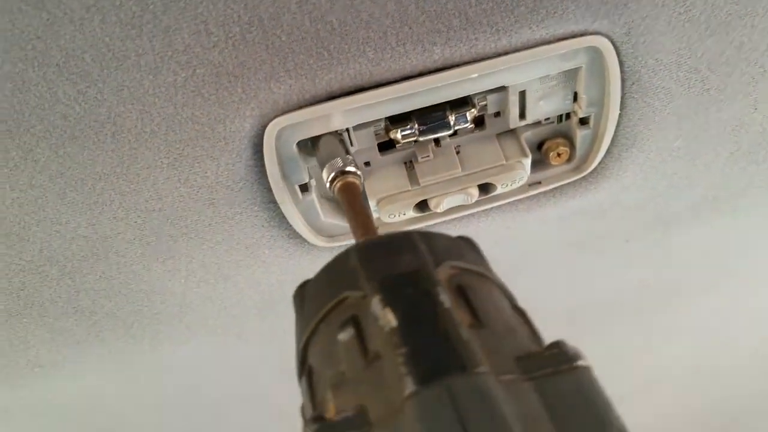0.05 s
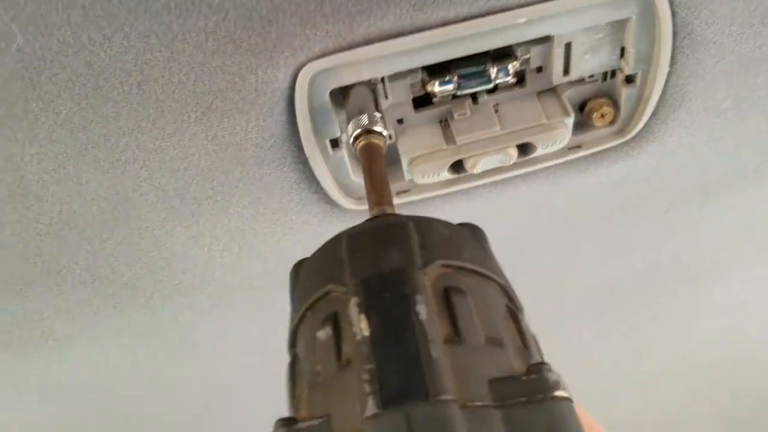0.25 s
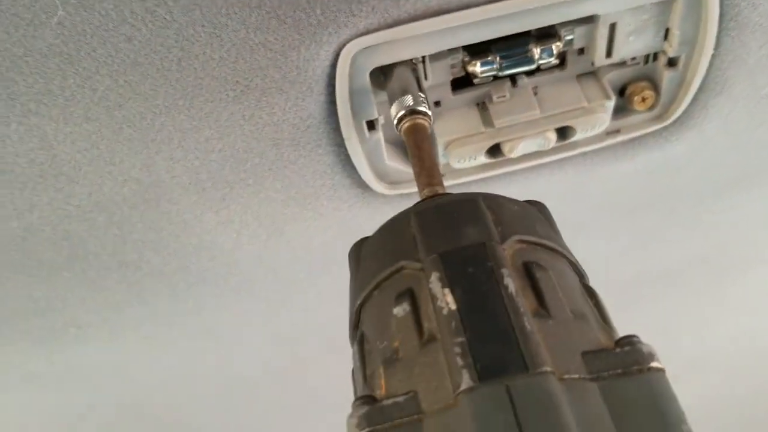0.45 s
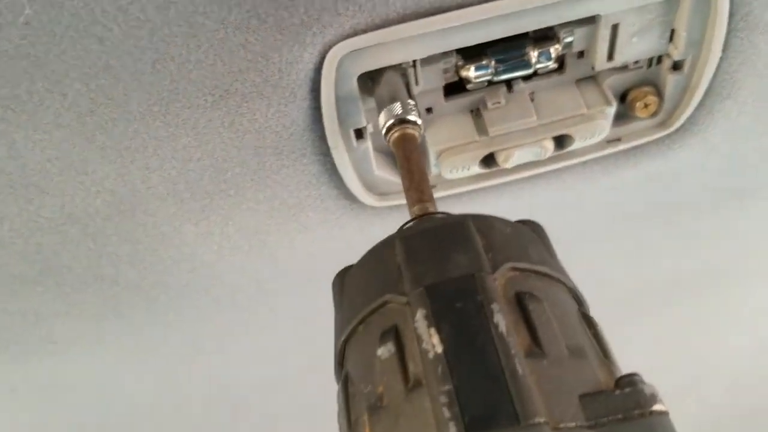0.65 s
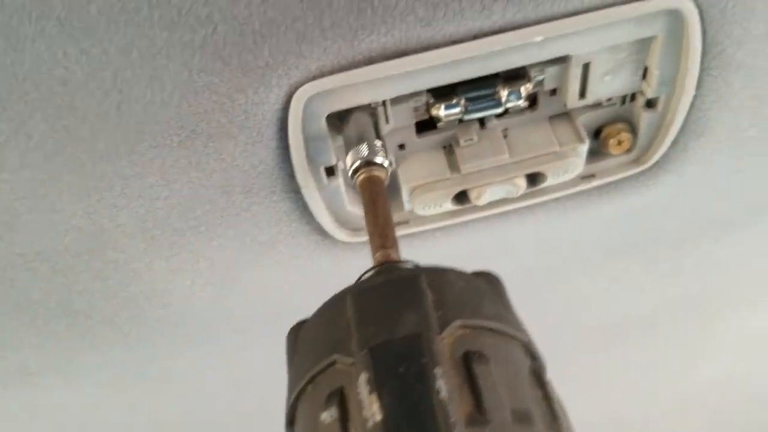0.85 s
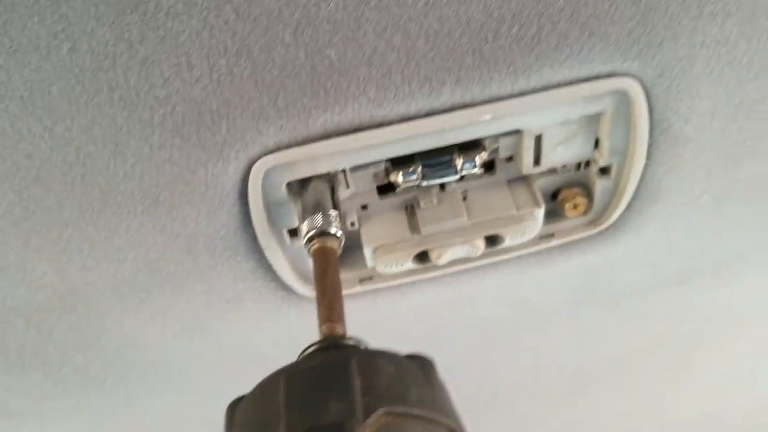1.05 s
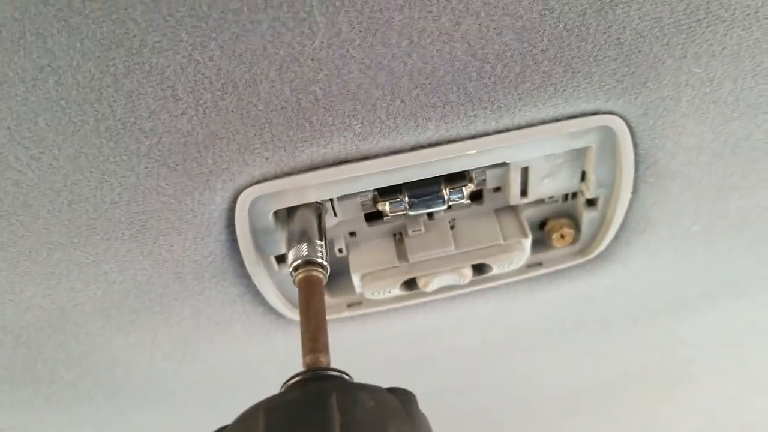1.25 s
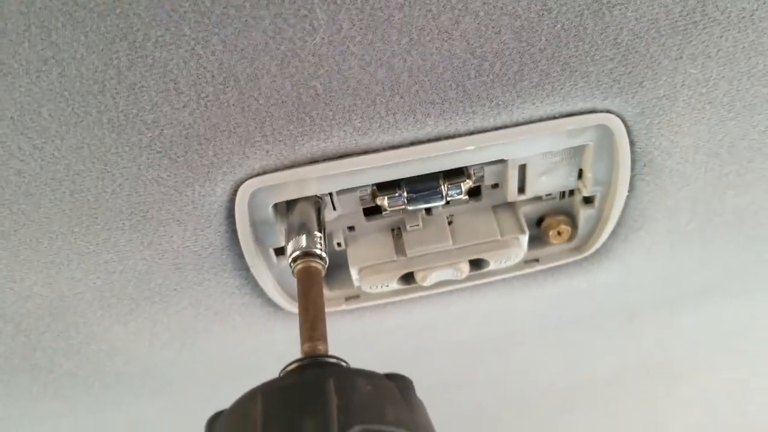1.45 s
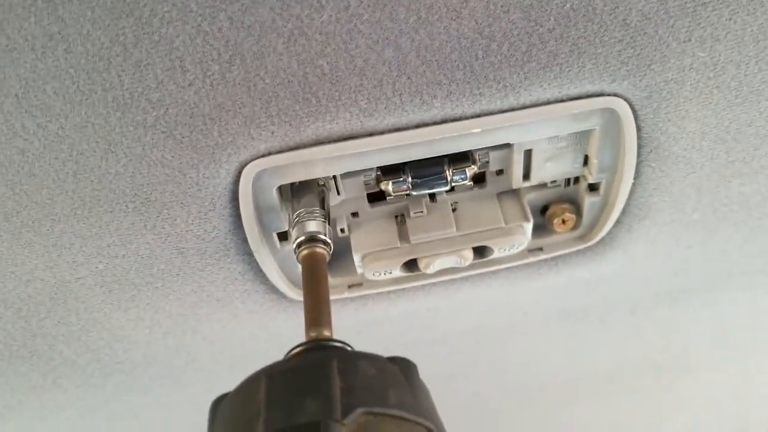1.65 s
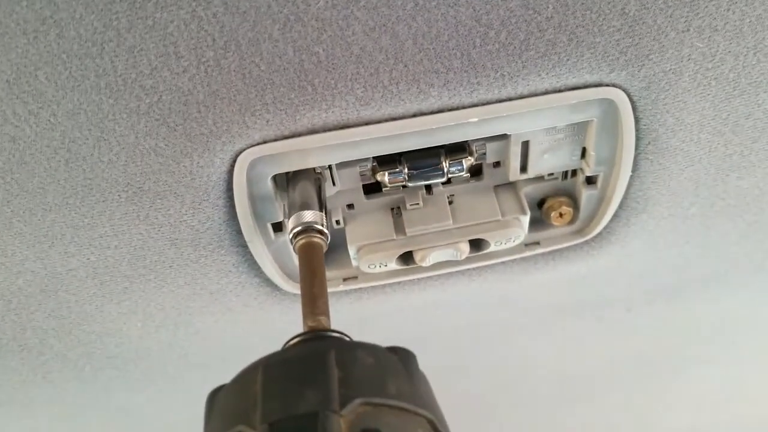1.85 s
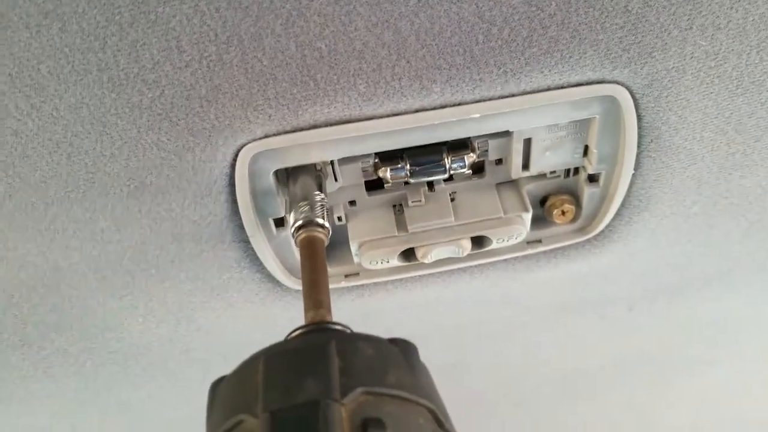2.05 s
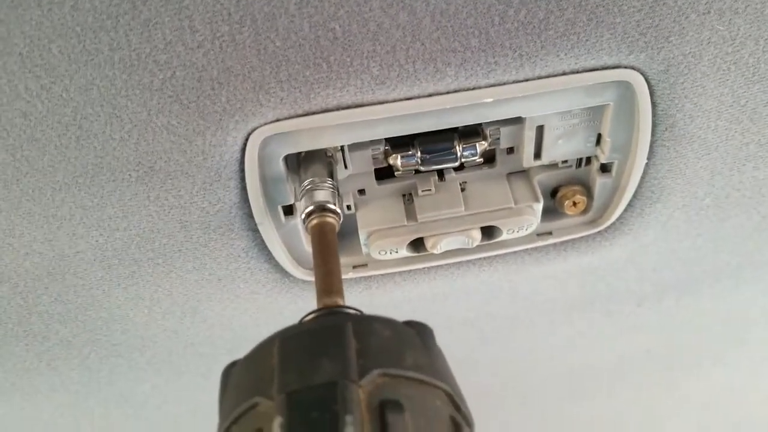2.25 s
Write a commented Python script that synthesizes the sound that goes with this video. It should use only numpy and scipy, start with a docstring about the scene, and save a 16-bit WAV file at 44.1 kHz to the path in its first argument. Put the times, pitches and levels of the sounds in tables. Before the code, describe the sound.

Close by in a parked car, a cordless drill is set against a plastic housing with hollow knocks. Following a short lull, its motor runs slowly with a high whine and gritty gear rasp, bumping twice over a faint rumble.

```python
"""Inside a parked car, a cordless drill is set against a screw in the plastic roof lamp.
The bit knocks on the housing and the roof panel booms in the cabin. The trigger clicks, the speed
control whines, and the motor drives the screw slowly with a rasp of brushes and gears, bumping twice.
A low rumble lies under it all."""
import sys
import numpy as np
from scipy import signal
from scipy.io import wavfile

SR = 44100
rng = np.random.default_rng(int(sys.argv[2]) if len(sys.argv) > 2 else 0)


def digitize_waveform(pressure):
    """Quantize a signal to 16-bit integers and store it at the path in sys.argv[1].

    Rows of a 2-D input are taken as channels; values are limited to [-1, 1].
    """
    field = np.atleast_2d(pressure).T
    bounded = np.clip(field, -1, 1)
    quanta = np.round(bounded * 32767).astype(np.int16)
    wavfile.write(sys.argv[1], SR, quanta)


N = 101429
T = np.arange(N) / SR
EDGES_HZ = 20 * 2 ** (np.arange(40) / 4)
CENTRES_HZ = np.sqrt(EDGES_HZ[1:] * EDGES_HZ[:-1])

# cabin left-right likeness: (frequency [Hz], correlation [-1..1])
CABIN_CORRELATION = [(60, 0.85), (130, 0.88), (290, 0.47), (640, 0.37), (1400, .1), (3000, 0.014),
                     (15000, 0.036)]
# background: (frequency [Hz], relative density [dB])
RUMBLE_SPECTRUM = [(22, -10), (40, 0), (62, 9), (120, -3.5), (150, -14.5), (195, -11.5), (240, -22),
                   (320, -21.5), (450, -46.5), (600, -37.5), (900, -46), (3000, -49.5), (9000, -57),
                   (13000, -45), (16000, -48)]
# drill on lamp housing: (time [s], boom [dB], body [dB], clack [dB], crack [dB], contact length [s])
BLOWS = [(0.032, -55.5, -65, -76, -61, 0.0083), (0.05, -42, -54, -55, -61, 0.024),
         (0.2068, -22.5, -25.5, -20, -40, 0.0056), (0.2101, -17, -14, -19, -18, 0.0076),
         (0.2293, -19.5, -16, -16.5, -20.5, 0.011), (0.281, -26.5, -26.5, -28.5, -39, 0.018),
         (0.2925, -16, -19.5, -22, -30.5, 0.005), (0.307, -19.5, -38, -29.5, -31, 0.014),
         (0.6419, -27.5, -21.5, -19, -24, 0.0015), (1.141, -45, -86, -85.5, -90, 0.02),
         (1.547, -45, -62, -57, -60, 0.0034), (1.681, -26.5, -40, -45, -50, 0.0095),
         (1.731, -32, -56, -46, -63, 0.0099), (1.996, -24.5, -36, -39, -51, 0.013),
         (2.036, -30, -57, -38, -55, 0.012)]
# blow noise: (frequency [Hz], relative density [dB])
KNOCK_SPECTRUM = [(25, -16.5), (40, -2), (50, -9), (68, 4), (115, 5.5), (165, -6), (300, -4.5), (450, -7.5),
                  (600, -3.5), (800, -16), (1050, -13.5), (1300, -12.5), (1900, -18.5), (2250, -20.5),
                  (2500, -20), (3200, -28), (6000, -27), (10000, -33), (15000, -33.5)]
# its decay: (frequency [Hz], t60 [s])
KNOCK_T60 = [(40, 0.17), (110, 0.6), (300, 0.38), (600, 0.27), (850, 0.15), (1300, 0.11), (2500, 0.081),
             (5000, .065), (14000, 0.034)]
# blow position: (frequency [Hz], left minus right [dB])
KNOCK_PAN = [(100, -0.85), (350, 0.5), (650, 2.5), (1300, 1.5), (4400, 2.1), (15000, -1.5)]
# roof panel and housing: (frequency [Hz], relative level [dB], t60 [s])
ROOF_MODES = [(38.2, -9.5, 0.29), (79, 0, 0.13), (88.44, -6, 0.61), (118.3, -12, .8), (194.6, -8, 0.42),
              (248.8, -19, 0.18), (299.7, -4.5, .3), (373.9, -10, .3), (413, -5, 0.28), (533, -4, 0.29),
              (585.5, -2.5, 0.19), (713, -15, 0.12), (889.5, -13, 0.13), (1173, -23, .06), (1247, -12, .1),
              (1525, -22.5, 0.11), (1945, -11.5, 0.06), (2090, -28.5, .06), (2430, -17.5, .06),
              (2760, -22.5, 0.033), (2990, -21.5, 0.05)]
# trigger plastic: (frequency [Hz], level [dB], t60 [s])
TRIGGER_MODES = [(1250, -64, 0.0022), (3000, -66.5, .003), (7800, -63, 0.0051), (9120, -70.5, .003),
                 (12030, -63.5, .004)]
# switching: (harmonic, left [dB], right [dB], lower, upper sideband [dB re harmonic])
WHINE_HARMONICS = [(1, -39.5, -45.5, -24, -9.5), (2, -59.5, -56, -13, 1), (3, -57, -61, 5.5, 0),
                   (4, -59, -70, -10, -2)]
# motor, sagging as the screw bites: (time [s], speed [turns/s])
MOTOR_SPEED = [(1.56, 115), (1.61, 135), (1.645, 130), (1.68, 165), (1.72, 174), (1.78, 186), (1.83, 174),
               (1.89, 166), (1.95, 171), (2.0, 171), (2.075, 192), (2.13, 168), (2.19, 170), (2.27, 158)]
# three rasp bursts per turn: (relative strength)
TURN_BURSTS = [1, .28, .28]
# brush and gear rasp: (time [s], level [dB])
RASP_LEVEL = [(1.57, -35), (1.61, -37), (1.665, -41), (1.685, -36), (1.755, -40), (1.79, -35),
              (1.84, -34.5), (1.92, -38), (2.005, -35.5), (2.035, -39.5), (2.083, -34), (2.12, -36),
              (2.21, -36), (2.26, -35.5), (2.285, -35)]
# its colour: (frequency [Hz], relative density [dB])
RASP_SPECTRUM = [(25, -3), (42, 20), (70, -12), (130, 19.5), (230, -3), (360, 5.5), (450, -4), (610, 5),
                 (740, 3), (820, -13), (1050, 0.5), (1350, 5), (1700, 1), (1900, -7), (2700, -1), (3450, 4),
                 (4150, -5.5), (4700, 3), (5200, 0), (5800, -6), (6700, -7), (7900, -3.5), (9400, -8.5),
                 (10500, -7.5), (11700, -4.5), (13300, -6.5), (15000, -4)]
# drill position: (frequency [Hz], left minus right [dB])
DRILL_PAN = [(150, -3), (650, 4), (1350, -3.5), (2300, 5), (4500, 0.5), (6500, 4), (8500, -3), (12000, 2),
             (15000, 5)]
# gear teeth: (multiple of motor speed, level at median speed [dB])
GEAR_ORDERS = [(1, -51.5), (3, -56), (4, -56.5), (7, -60), (8, -57), (9, -54.5), (10, -58)]

BOOM_HZ, BODY_HZ, CLACK_HZ, CRACK_HZ = 110, 600, 1600, 5000
CLICK_S, POWER_ON_S, MOTOR_START_S, SPIN_UP_S = 1.4105, 1.5365, 1.563, 0.047


def from_db(db):
    """Decibels to gain."""
    return 10 ** (np.asarray(db) / 20)


def unit_rms(x):
    """Scale to rms 1."""
    return x / np.sqrt(np.mean(x ** 2) + 1e-20)


def in_time(rows):
    """Table value at every sample."""
    return np.interp(T, *np.transpose(rows))


def at_hz(rows, hz):
    """Table value on a log-frequency axis."""
    freqs_hz, values = np.transpose(rows)
    return np.interp(np.log(hz), np.log(freqs_hz), values)


def fade(age_s, t60_s):
    """Exponential decay."""
    return np.exp(-np.log(1000) * np.maximum(age_s, 0) / t60_s)


def drift(rate_hz):
    """Smooth random curve, rms 1."""
    pole = np.exp(-80 * np.pi * rate_hz / SR)
    slow = signal.lfilter([1], [1, -2 * pole, pole * pole], rng.standard_normal(N // 40 + 2002))[2000:]
    return np.interp(np.arange(N) / 40, np.arange(len(slow)), unit_rms(slow))


def ring(x, hz, t60_s):
    """Resonator: a unit impulse starts a decaying sine of height 1."""
    r, w = fade(1 / SR, t60_s), 2 * np.pi * hz / SR
    return signal.lfilter([0, np.sin(w)], [1, -2 * r * np.cos(w), r * r], x + 1e-18)


def pan(rows, hz):
    """Left and right gains at one frequency."""
    db = at_hz(rows, hz)
    return from_db(np.array([[db], [-db]]) / 2)


def noise_bands(spectrum):
    """Quarter-octave stereo cabin noise as (centre [Hz], band); band powers sum to 1."""
    gains = from_db(at_hz(spectrum, CENTRES_HZ)) * np.sqrt(np.diff(EDGES_HZ))
    gains /= np.linalg.norm(gains)
    white = rng.standard_normal((3, 2, N + SR // 4))
    for k, hz in enumerate(CENTRES_HZ):
        sos = signal.butter(2, EDGES_HZ[k:k + 2], "band", fs=SR, output="sos")
        mid, side = signal.sosfilt(np.vstack([sos, sos]), white[k % len(white)])[:, -N:]
        alike = at_hz(CABIN_CORRELATION, hz)
        stereo = np.sqrt(1 + alike) * mid + np.sqrt(1 - alike) * side * [[1], [-1]]
        yield hz, gains[k] * unit_rms(stereo)


def cabin():
    """Low rumble, faint hiss and a dying rustle of handling the drill."""
    rumble = from_db(-49.5) * sum(band for _, band in noise_bands(RUMBLE_SPECTRUM))
    rustle = from_db(-59.5 + 2 * drift(60)) * fade(T, t60_s=.3) * rng.standard_normal((2, N))
    return rumble + rustle


def contact_clicks(contacts):
    """Direct sound of the bit: a sharp click from a short contact, little from a long one."""
    force = blow_gains(CRACK_HZ) @ contacts * rng.standard_normal((2, N))
    band_hz = [900, 5000]
    sos = signal.butter(1, band_hz, "band", fs=SR, output="sos")
    return from_db(37) * signal.sosfilt(sos, force + 1e-18)


def blow_gains(hz):
    """Gain of every blow at one frequency."""
    anchors_hz = BOOM_HZ, BODY_HZ, CLACK_HZ, CRACK_HZ
    return from_db([at_hz(list(zip(anchors_hz, row[1:-1])), hz) for row in BLOWS])


def roof_ring(starts_s, gain_db=-5.5, scatter_db=2.5):
    """Each blow rings the modes of roof panel and housing, with random strength."""
    out = np.zeros((2, N))
    for k, (hz, db, t60_s) in enumerate(ROOF_MODES):
        scatter = from_db(scatter_db * rng.standard_normal(len(starts_s)))
        impulses = np.zeros(N)
        impulses[(starts_s * SR).astype(int)] = blow_gains(hz) * scatter
        out -= (-1) ** k * from_db(gain_db + db) * ring(impulses, hz, t60_s) * pan(KNOCK_PAN, hz)
    return out


def knocks():
    """Each blow cracks, rings the roof and dies away in the cabin, bass last."""
    starts_s = np.array(BLOWS)[:, 0]
    contacts = np.array([np.maximum(0, 1 - 2 * np.abs(T - start_s) / length_s)
                         for start_s, *_, length_s in BLOWS])
    contacts /= contacts.sum(axis=1, keepdims=True)
    out = contact_clicks(contacts)
    for hz, band in noise_bands(KNOCK_SPECTRUM):
        energy = blow_gains(hz) ** 2 @ contacts + 1e-18
        # decay stages: (gain, t60 [s])
        main = 1, at_hz(KNOCK_T60, hz)
        snap = from_db(-2) * hz / (hz + BODY_HZ), 0.0062
        tail = from_db(-26), 0.22
        power = sum(signal.lfilter([gain ** 2], [1, -fade(2 / SR, t60_s)], energy)
                    for gain, t60_s in (main, snap, tail))
        out += band * np.sqrt(power) * pan(KNOCK_PAN, hz)
    return out + roof_ring(starts_s)


def trigger_click():
    """The finger takes up the trigger: a tiny plastic click with a short cabin tail."""
    age_s = T - CLICK_S
    plastic = sum(from_db(db) * unit_rms(ring(rng.standard_normal((2, N)), hz, t60_s))
                  for hz, db, t60_s in TRIGGER_MODES)
    envelope = fade(age_s, t60_s=.018) + from_db(-13) * fade(age_s, t60_s=.11)
    return plastic * (age_s > 0) * envelope


def whine(running, idle_hz=3945, run_hz=3808.5, ripple_hz=138, wobble_rad=.55):
    """Switched current makes the windings sing; its ripple puts sidebands on each harmonic."""
    started = T > MOTOR_START_S
    ripple = 2 * np.pi * ripple_hz * T
    switch_hz = np.where(started, run_hz, idle_hz) + 1.63 * drift(9.3)
    switch_phase = 2 * np.pi * np.cumsum(switch_hz) / SR
    out = 0
    for k, left_db, right_db, lower_db, upper_db in WHINE_HARMONICS:
        phase = k * switch_phase + np.array([[0], [1.7]])
        upper = from_db(upper_db) * np.sin(phase + ripple + wobble_rad * drift(8.5))
        lower = from_db(lower_db) * np.sin(phase - ripple + wobble_rad * drift(10))
        carrier = np.sin(phase) * from_db(1.8 * drift(30.6))
        idle_db = np.where(started, 0, -0.5 - 2 * (k - 1))
        gain = from_db(idle_db) * from_db([[left_db], [right_db]])
        out += gain * (carrier + running * (upper + lower))
    return np.sqrt(2) * out * np.clip((T - POWER_ON_S) / 0.0017, 0, 1)


def rasp(turn_rad, sharpness=7, chatter_share=.68):
    """Brushes and gears rasp; the treble comes in uneven bursts on every turn."""
    bursts = sum(size * np.exp(sharpness * (np.cos(turn_rad - 2 * np.pi * k / len(TURN_BURSTS)) - 1))
                 for k, size in enumerate(TURN_BURSTS))
    bursts = unit_rms(bursts * from_db(0.33 * drift(320)))
    chatter = unit_rms(1 - chatter_share + chatter_share * bursts)
    noise = sum(band * pan(DRILL_PAN, hz) * from_db(drift(12)) * (chatter if hz > BODY_HZ else 1)
                for hz, band in noise_bands(RASP_SPECTRUM))
    return from_db(in_time(RASP_LEVEL)) * reflections(noise)


def reflections(x, per_side=12, max_delay_s=.014, strength=.5):
    """Glass and roof comb the treble, differently on each side; output rms 1."""
    out = x.copy()
    treble = signal.sosfilt(signal.butter(2, BODY_HZ, "high", fs=SR, output="sos"), x)
    for k, (distance, polarity) in enumerate(rng.random((2 * per_side, 2))):
        lag = 1 + int(distance * max_delay_s * SR)
        gain = np.sign(polarity - .5) * strength / np.sqrt(per_side)
        out[k % 2, lag:] += gain * treble[k % 2, :-lag]
    return unit_rms(out)


def gear_hum(turn_rad, waver_db=2.5, flutter_rad=.6):
    """Teeth hum at multiples of the motor speed, wavering in level and phase."""
    out = 0
    for order, db in GEAR_ORDERS:
        gain = np.sqrt(2) * from_db(db + waver_db * drift(4.9))
        phase = order * turn_rad + flutter_rad * drift(51)
        stereo_rad = np.sqrt(order) * .5 * rng.standard_normal((2, 1))
        out += gain * np.sin(phase + stereo_rad)
    return out


def case_ring(hz=606.4):
    """The drill's hollow case rings at one pitch."""
    return from_db(-50.5) * unit_rms(ring(rng.standard_normal(N), hz, t60_s=0.25)) * pan(DRILL_PAN, hz)


def drill():
    """Whine first, then the motor spins up; gear hum and case ring grow with speed."""
    speed_hz = in_time(MOTOR_SPEED)
    turn_rad = 2 * np.pi * np.cumsum(speed_hz) / SR
    speed_gain = (speed_hz / np.median(np.array(MOTOR_SPEED)[:, 1])) ** 2.1
    stirring = from_db(-23) * np.clip((T - POWER_ON_S) / 0.0055, 0, 1)
    running = np.clip((T - MOTOR_START_S) / SPIN_UP_S, 0, 1)
    windings = whine(running)
    motor = rasp(turn_rad) + speed_gain * (gear_hum(turn_rad) + case_ring())
    return windings + np.maximum(running, stirring) * motor


def scene():
    """Knocks, trigger and drill over the cabin background."""
    return knocks() + trigger_click() + drill() + cabin()


def record(dry):
    """Steep low-pass."""
    cutoff_hz = 15500
    return signal.sosfilt(signal.ellip(10, .2, 80, cutoff_hz, fs=SR, output="sos"), dry)


dry = scene()
out = record(dry)
digitize_waveform(out)
```